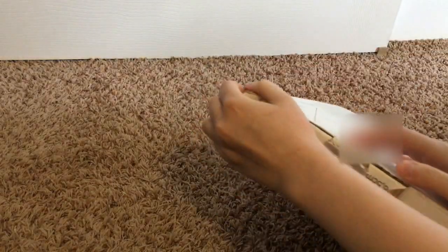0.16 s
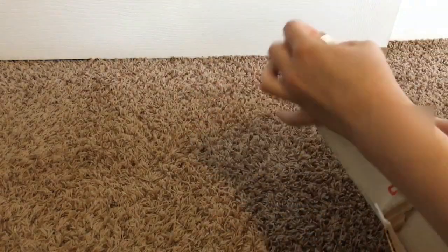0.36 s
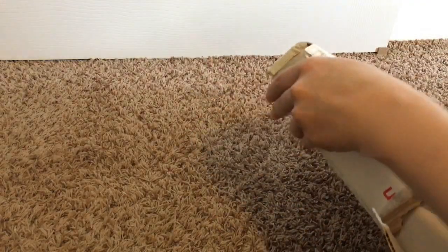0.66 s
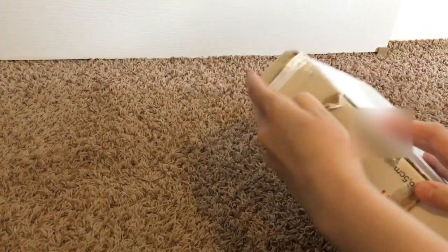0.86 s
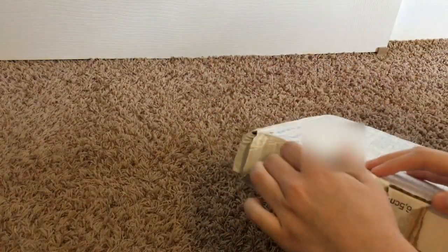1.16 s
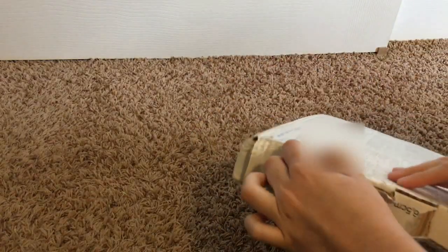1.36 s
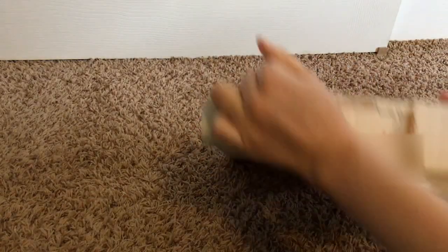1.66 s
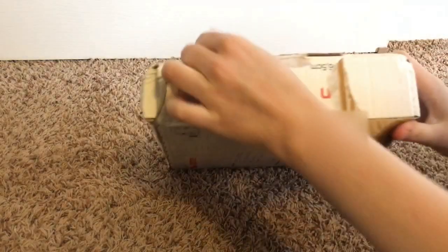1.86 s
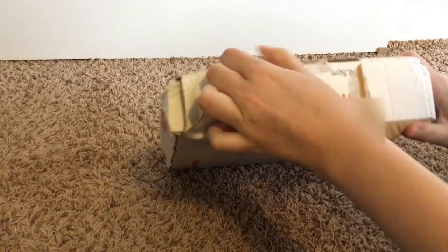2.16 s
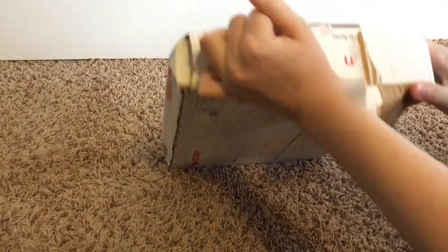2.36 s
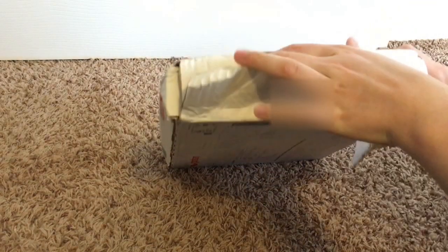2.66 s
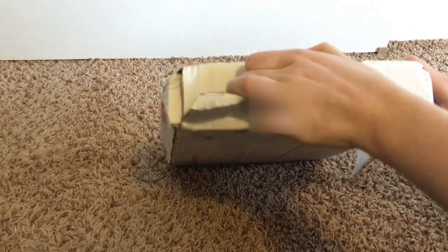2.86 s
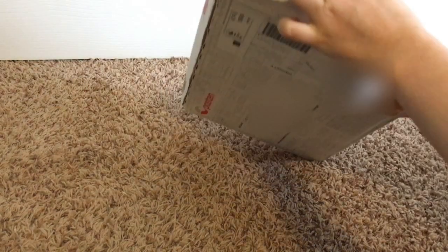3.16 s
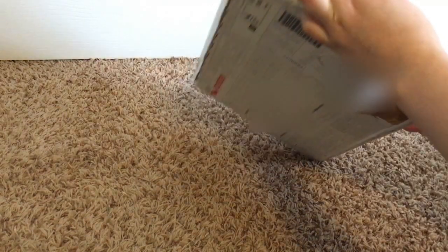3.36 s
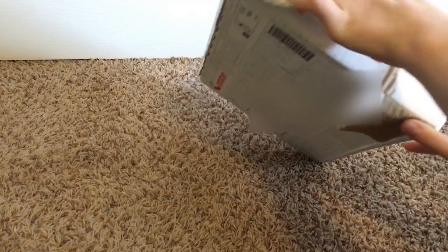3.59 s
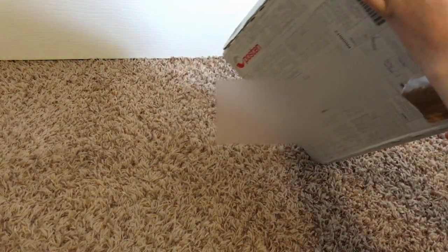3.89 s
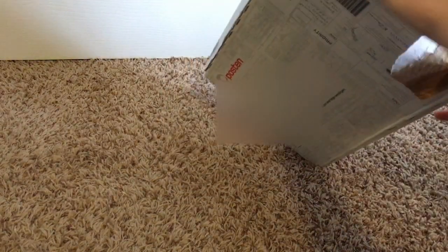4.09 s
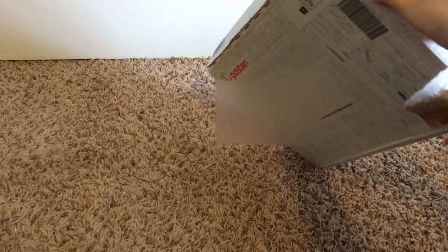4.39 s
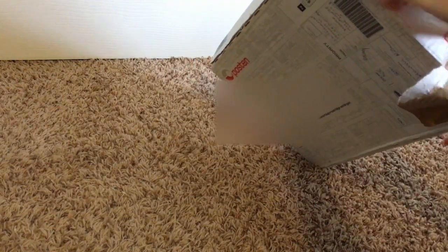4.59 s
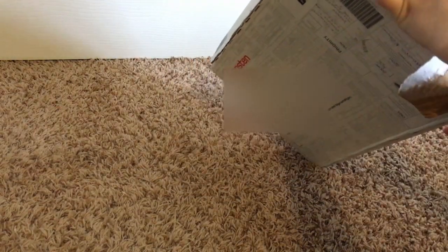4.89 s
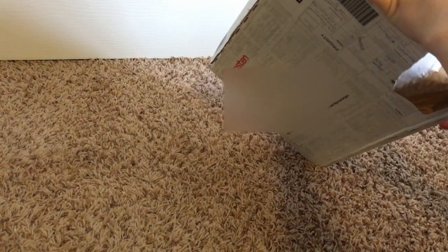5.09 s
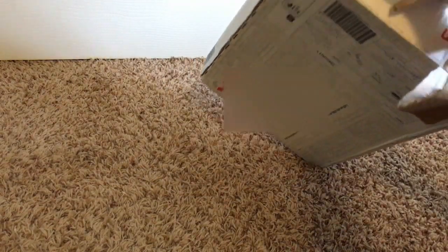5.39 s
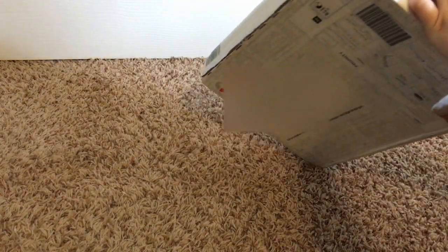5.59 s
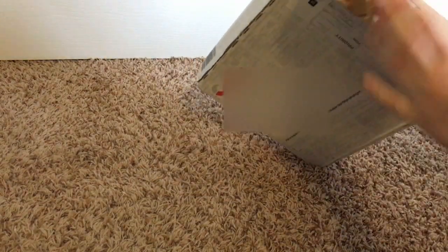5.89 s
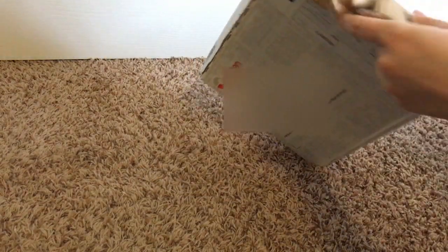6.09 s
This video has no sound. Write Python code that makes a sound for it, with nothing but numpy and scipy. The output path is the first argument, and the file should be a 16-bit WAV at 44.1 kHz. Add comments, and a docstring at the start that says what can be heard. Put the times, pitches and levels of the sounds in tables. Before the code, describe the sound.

Hands turn and pull open a cardboard mailing box on carpet, with soft scuffs, papery crinkles, sharp creases and one loud crack near the end.

```python
"""Opening a cardboard box on a carpet

A cardboard mailing box is turned over and pulled open by hand, close by in a small room.
Creases snap as short bending pulses, walls pop, binding flaps creak in trains of equal slips, and short rasps,
from soft scuffs to loud tears, are bursts of noise. Hands and flaps scuff and squeak: coloured noise and fuzzy
falling partials. All but the dull jolts rings briefly in the hollow box; a short room echo and quiet air
noise surround it."""
import sys
import numpy as np
from scipy import signal
from scipy.fft import rfft, irfft
from scipy.io import wavfile
from scipy.ndimage import uniform_filter1d, map_coordinates

SR = 44100
rng = np.random.default_rng(int(sys.argv[2]) if len(sys.argv) > 2 else 0)


def bounce(signal):
    """Save signal as a 16-bit WAV file at the path given by the first command-line argument."""
    frames = np.transpose(np.atleast_2d(signal))
    limited = np.clip(frames, -1, 1)
    pcm = np.round(limited * 32767).astype(np.int16)
    wavfile.write(sys.argv[1], SR, pcm)


N = 275625  # length in samples

# Before mixing, the level of a snap or slip is its rms over this many seconds.
SNAP_SPAN_S = .005

# Colour of the low drumming of rubbed board. Each row: frequency in Hz, relative level per hertz in dB.
DRUM_COLOUR = [(60, -47.5), (140, -4), (260, -4), (420, 1), (620, -1), (850, -8.5), (1300, -38.5)]
# Colour of the scuffing of rubbed board. Each row: frequency in Hz, relative level per hertz in dB.
SCUFF_COLOUR = [(500, -26.5), (850, -6), (1120, 3), (1600, 1), (2000, -5), (2600, -4), (3800, -6.5),
                (7000, -40)]
# Colour of hissing or cracking paper skin. Each row: frequency in Hz, relative level per hertz in dB.
HISS_COLOUR = [(2500, -33.5), (4000, -0.5), (4800, -3), (6000, 0.5), (8000, -4.5), (12000, -5),
               (16000, -10.5)]


def amp(db):
    """Turns decibels into a gain."""
    return 10 ** (np.asarray(db) / 20)


def unit(x):
    """Scales to rms 1."""
    return x / np.sqrt(np.mean(abs(x) ** 2) + 1e-20)


def read(points, hz):
    """Reads a table along a logarithmic frequency axis."""
    f, value = np.transpose(points)
    return np.interp(np.log(hz + 1), np.log(f + 1), value)


def add(mix, s, sound):
    """Mixes a sound in at s seconds."""
    part = mix[max(round(s * SR), 0):][:len(sound)]
    part += sound[:len(part)]


def causal(gain):
    """Finds the spectrum with these gains whose response starts at once and then dies away."""
    log_gain = np.log(np.maximum(gain, gain.max() * 1e-4))
    circle = np.concatenate([log_gain, log_gain[-2:0:-1]])
    return np.exp(np.conj(signal.hilbert(circle)))[:len(gain)]


def ringing(points, size=2048):
    """The response, of energy 1, of a board with this spectrum."""
    hz = np.fft.rfftfreq(size, 1 / SR)
    response = irfft(causal(amp(read(points, hz))))
    return response / np.linalg.norm(response)


def coloured(x, points):
    """Gives x a spectrum, at rms 1."""
    return unit(signal.oaconvolve(x, ringing(points))[:len(x)])


def hump(hz, centre_hz, octaves):
    """A broad resonance with steep skirts, at rms 1."""
    distance = np.log2((hz + 1) / centre_hz) / octaves
    return unit(1 / (1 + distance ** 2) ** 2)


def bend(pulse, pitch_hz, travel):
    """Bending waves: the treble travels faster and arrives first; the pitch takes `travel` seconds."""
    hz = np.fft.rfftfreq(len(pulse), 1 / SR)
    return irfft(rfft(pulse) * np.exp(-2j * np.pi * travel * 2 * np.sqrt(hz * pitch_hz)))


def wander(x, depth_db, size=512, count=36):
    """As the contact point moves, different resonances of the board come and go."""
    overlap = size * 3 // 4
    hz, _, z = signal.stft(x, SR, nperseg=size, noverlap=overlap)
    patches = unit(uniform_filter1d(rng.standard_normal((count, z.shape[1])), size=14, axis=1))
    band = np.interp(np.log(hz + 1), np.log(np.geomspace(150, 16000, count)), np.arange(count))
    where = np.meshgrid(band, np.arange(z.shape[1]), indexing="ij")
    field = map_coordinates(patches, where, order=1)
    return signal.istft(z * amp(depth_db * field), SR, nperseg=size, noverlap=overlap)[1][:N]


def snap(flex_db, pitch_hz, crack_db, thud_db, size=2048):
    """The board flexes and thuds while its paper skin cracks."""
    hz, t = np.fft.rfftfreq(size, 1 / SR), np.arange(size) / SR
    flex_gain = amp(flex_db) * hump(hz, pitch_hz * .96, octaves=0.93)
    thud_gain = amp(thud_db) * hump(hz, 472, octaves=0.9)
    gain = np.hypot(flex_gain, thud_gain)
    # the wave comes back from the nearest folds and edges, differently at every spot
    echoes = rfft((t == 0) + 0.19 * rng.standard_normal(size) * np.exp(-t / 0.0021))
    flex = unit(irfft(causal(gain) * echoes)) * np.sqrt(np.mean(gain ** 2))
    burst = rng.standard_normal(size) * np.exp(-t / 0.0014) * (t > .0003)
    crack = amp(crack_db) * coloured(burst, HISS_COLOUR)
    return (bend(flex, pitch_hz, travel=0.000625) + crack) * np.sqrt(SNAP_SPAN_S * SR / size)


def snaps():
    """Single buckles: creases snap, and whole walls pop in or out with a duller, hollow sound."""
    # A crease buckles. Each row: time in seconds, flex level in dB, nominal flex pitch in Hz,
    # level in dB of the crack of the paper skin; levels are before mixing.
    crease_rows = [(.2917, -37, 1310, -63), (.8647, -39, 3370, -42), (.932, -42.5, 1440, -41),
                   (1.0643, -35, 1860, -56), (1.1957, -34.5, 1840, -51), (1.213, -35, 1890, -49),
                   (1.2358, -34, 1970, -50), (1.2466, -33, 1810, -54), (1.2585, -32, 2010, -60),
                   (1.617, -21.5, 1740, -46), (1.9586, -35, 1480, -44), (1.9647, -34.5, 1120, -40.5),
                   (2.3457, -42, 1820, -51), (2.375, -51, 1910, -38), (2.389, -23, 2620, -26),
                   (2.5774, -22, 1100, -49), (2.5805, -32.5, 1260, -44.5), (2.6857, -43, 1900, -46),
                   (2.7341, -34.5, 1970, -72), (2.811, -36.5, 2270, -58), (2.8222, -37, 1960, -57),
                   (2.829, -32, 2060, -45), (2.843, -30.5, 2500, -46), (2.8462, -38, 1780, -51),
                   (2.972, -45, 3360, -38), (2.9832, -46, 2690, -36), (3.0082, -37, 1350, -62),
                   (3.0908, -38.5, 2400, -46), (3.1028, -41, 3100, -47), (3.5146, -33, 1480, -42),
                   (3.7578, -42.5, 1450, -45.5), (3.8971, -28, 1460, -36.5), (3.996, -35, 2210, -39),
                   (4.003, -32.5, 2150, -40), (4.018, -28, 1900, -47), (4.0224, -27.5, 1600, -39),
                   (4.687, -35.5, 2460, -35.5), (4.7414, -48, 1600, -39.5), (4.88, -41.5, 1200, -40.5),
                   (5.024, -39.5, 3120, -37.5), (5.0638, -39.5, 2320, -43), (5.0992, -33.5, 2260, -39.5),
                   (5.1148, -42, 2310, -39), (5.4427, -38, 1490, -51), (5.5618, -43, 3230, -36),
                   (5.6969, -17, 1570, -28.5), (5.7008, -12.5, 1350, -26), (5.8585, -36, 3180, -44),
                   (6.1137, -32, 3500, -40), (6.212, -43, 2370, -45.5)]
    # A whole wall pops. Each row: time in seconds, thud level in dB before mixing.
    pop_rows = [(0.0767, -41.5), (1.0643, -45.5), (1.3219, -37), (1.757, -44.5), (2.1247, -44),
                (2.389, -32.5), (2.5862, -36.5), (2.8458, -39), (3.2599, -38.5), (3.2979, -40.5),
                (3.3474, -46), (3.3638, -38.5), (3.386, -41.5), (3.4047, -41), (3.446, -41),
                (3.4525, -41.5), (3.5643, -42.5), (5.5508, -35.5), (5.9125, -47), (6.19, -41.5)]
    # the wider the fold, the lower it sounds and the more it thuds
    thud_re_flex_at_1khz_db, thud_fall_db_per_octave = -9, 17.5
    # all walls sound alike: nominal pitch, and flex and crack relative to the thud
    pop_hz, pop_flex_db, pop_crack_db = 1166, -1, -17
    out = np.zeros(N)
    for s, db, pitch_hz, crack_db in crease_rows:
        thud_db = db + thud_re_flex_at_1khz_db - thud_fall_db_per_octave * np.log2(pitch_hz / 1000)
        add(out, s - .0006, snap(db, pitch_hz, crack_db, thud_db))  # early, as the wave takes time to arrive
    for s, db in pop_rows:
        add(out, s - .0006, snap(db + pop_flex_db, pop_hz, db + pop_crack_db, db))
    return out


def rasps():
    """Short rasps, from soft scuffs to loud tears: uneven noise that rises quickly and dies away."""
    # Soft scuffs to loud tears of paper or tape. Each row: start in seconds, rise in seconds,
    # decay time constant in seconds, scuff level in dB before mixing, hiss and drumming in dB relative to it.
    rasp_rows = [(.185, 0.0018, 0.0086, -48, 0, 5), (.428, 0.0019, 0.0077, -43, -10, -5),
                 (.496, 0.0038, 0.0035, -43, -3, -7), (1.058, 0.01, 0.0084, -35.5, -11.5, -14),
                 (2.372, 0.0011, 0.0049, -32.5, -4.5, -13), (2.39, 0.00084, 0.0035, -25.5, 6, 2),
                 (2.394, 0.012, 0.011, -24, 5, -10), (2.835, 0.0066, 0.01, -32.5, -7.5, 0),
                 (3.996, 0.021, 0.016, -30.5, -0.5, -4), (4.157, 0.0018, 0.0089, -34, -12, -5.5),
                 (4.268, 0.0039, 0.0035, -41.5, 2, -11), (4.311, 0.0074, 0.011, -42.5, -14, -14),
                 (4.683, 0.011, 0.012, -33, -4, -9), (5.383, 0.002, 0.007, -40, -4, -8),
                 (5.498, 0.0015, 0.0063, -39.5, -10, -18), (5.549, 0.0021, 0.0093, -36, 6.5, 2),
                 (5.695, 0.0039, 0.002, -19.5, 3, -7.5)]
    # Colour of the hiss in a rasp. Each row: frequency in Hz, relative level per hertz in dB.
    rasp_hiss_colour = [(2000, -42.5), (3700, -7.5), (4900, 1), (6500, 2.5), (8500, -3.5), (11500, -2),
                        (16000, -9.5)]
    t, out = np.arange(SR // 4) / SR, np.zeros(N)
    for s, rise, decay, db, hiss_db, drum_db in rasp_rows:
        shape = np.minimum(t / rise, 1) * np.exp(-np.maximum(t - rise, 0) / decay)
        noise = rng.standard_normal(len(t))
        unevenness = unit(uniform_filter1d(rng.standard_normal(len(t)), size=30))
        rough = noise * amp(4.0 * unevenness)
        drum, scuff, hiss = (coloured(rough, colour) for colour in (DRUM_COLOUR, SCUFF_COLOUR, rasp_hiss_colour))
        add(out, s, amp(db) * shape * (scuff + amp(hiss_db) * hiss + amp(drum_db) * drum))
    return wander(out, depth_db=2.26)


def creak(rows, colour):
    """Stick and slip: every slip sends the same bending wave through the flap."""
    s, *columns = np.transpose(rows)
    t, out = np.arange(s[0], s[-1], 1 / SR), np.zeros(N)
    rate, db = (np.interp(t, s, c) for c in columns)
    slip = bend(ringing(colour), pitch_hz=1700, travel=0.001022) * np.sqrt(SNAP_SPAN_S * SR)
    slips_so_far = np.floor(np.cumsum(rate) / SR)
    for i in np.flatnonzero(np.diff(slips_so_far, prepend=-1)):
        late, harder = rng.standard_normal(2)  # slips vary slightly in time and force
        add(out, t[i] - .0006 + .0001 * late, amp(db[i] + 0.39 * harder) * slip)
    return out


def creaks():
    """A flap binds and slips twice, first briefly, then for longer."""
    # The two creaks as they go. Each row: time in seconds, slips per second, level in dB before mixing.
    short_rows = [(1.654, 98, -39), (1.662, 198, -39), (1.672, 290, -43), (1.684, 170, -41)]
    long_rows = [(5.2, 253.4, -41), (5.212, 326, -37.5), (5.228, 309, -38), (5.24, 211.8, -43),
                 (5.262, 185, -38), (5.282, 99.3, -31), (5.293, 154, -39), (5.306, 264, -34)]
    # Colour of one slip in each creak. Each row: frequency in Hz, relative level per hertz in dB.
    short_colour = [(200, -36), (600, -9), (1100, 4), (1450, 6), (2100, -31), (3500, -38), (12000, -50)]
    long_colour = [(150, -31), (350, -7.5), (430, 4.5), (520, -15), (1000, -8.5), (1620, 5.5), (2100, -3.5),
                   (2600, -6.5), (3100, -4), (4400, -12), (5200, -31), (6500, -24), (12000, -50)]
    return creak(short_rows, short_colour) + creak(long_rows, long_colour)


def contact():
    """Strength of drumming, scuff and hiss: each stroke takes hold, swells or eases, and lets go."""
    # A hand or flap slides over the board. Each row: start in seconds, length in seconds,
    # scuff level in dB before mixing, swell from start to end in dB, hiss and drumming in dB relative to scuff.
    stroke_rows = [(0, 0.041, -51, -10, -12, 1), (0.063, 0.063, -51.5, -7, 0.5, -1.5),
                   (0.176, 0.14, -53, 7, 0.5, -3.5), (0.355, 0.043, -56.5, 0, 1.5, -7),
                   (0.454, 0.083, -60.5, 14, -0.5, -4), (0.682, 0.041, -68.5, 2, -22, 14.5),
                   (.775, 0.025, -43, -1, 2, -22), (0.807, 0.097, -48.5, -4.5, 7, -17),
                   (0.936, 0.14, -56.5, -10, -1.5, -5.5), (1.068, 0.048, -52, -7, -7, -0.5),
                   (1.118, 0.091, -48.5, 5, 0, 3), (1.204, 0.063, -54, -6, -0.5, 3),
                   (1.309, 0.11, -50.5, -16, -7, -13), (1.383, 0.21, -52, 11.5, 2, -6.5),
                   (1.618, 0.086, -55, 7, -3.5, -3.5), (1.788, 0.076, -63.5, 7, 7, 4),
                   (1.88, 0.13, -56.5, -20, 0, -10.5), (2.063, 0.075, -46, -20, -7, -7.5),
                   (2.157, 0.03, -55.5, 0, -19, 1), (2.224, 0.16, -54.5, -11.5, -6, -3),
                   (2.421, 0.055, -44.5, 9.5, 3, -28), (2.57, 0.11, -49, 11.5, -2.5, -6.5),
                   (2.776, .1, -46.5, 7.5, -8.5, -1), (2.934, 0.2, -53, 2.5, -1.5, -8.5),
                   (3.319, 0.07, -54, 5, -3, -0.5), (3.44, 0.027, -53.5, -8, -24, 3),
                   (3.5, 0.11, -50.5, 10.5, 0.5, -6), (3.629, 0.13, -57.5, -7, 3, 1),
                   (3.787, 0.14, -52.5, 10, -4.5, -28), (4.162, 0.11, -53, -13, -2, -14),
                   (4.239, 0.12, -50.5, 7, -7, -11.5), (4.37, 0.2, -53.5, -9, 3.5, -15),
                   (4.565, 0.02, -49, 6, 3.5, -24), (4.658, 0.064, -49, 1, 3.5, -8),
                   (4.751, 0.18, -51, -5.5, -4, -9), (5.1, 0.085, -56.5, 2, -4, -26),
                   (5.21, .09, -47.5, 7, -8, -8.5), (5.308, 0.13, -51.5, -4, -4, -20),
                   (5.496, 0.081, -57, 7, -1, -11), (5.585, 0.035, -50.5, 5, -16, -22),
                   (5.696, 0.065, -42, -18, -10, -7), (5.823, 0.049, -53, -7, 1, -5.5),
                   (5.95, 0.069, -50.5, 3.5, 0.5, -9), (6.079, 0.12, -53, -2, 0, -6.5)]
    # Between strokes the holding hand still creeps on the board.
    # Each row: time in seconds, scuff level in dB before mixing.
    hold_rows = [(0, -60), (0.551, -59), (.65, -66.5), (1, -53.5), (1.8, -58), (2.03, -62.5), (2.5, -53.5),
                 (3.2, -60.5), (3.7, -60), (4.1, -59.5), (4.95, -60.5), (5.7, -56), (6.25, -62.5)]
    hold_hiss_db, hold_drum_db = -5.5, -4.5  # relative to the scuff
    attack_s, release_s = 0.013, 0.008  # every stroke takes hold and lets go alike
    hold_db = np.interp(np.arange(N) / SR, *np.transpose(hold_rows))
    power = amp([hold_db + hold_drum_db, hold_db, hold_db + hold_hiss_db]) ** 2
    t = np.arange(SR // 2) / SR
    for s, length, db, swell_db, hiss_db, drum_db in stroke_rows:
        shape = np.minimum(t / attack_s, 1) * np.exp(-np.maximum(t - length, 0) / release_s)
        push = shape * amp(db + swell_db * (np.minimum(t / length, 1) - .5))
        for layer, layer_db in zip(power, (drum_db, 0, hiss_db)):
            add(layer, s, (push * amp(layer_db)) ** 2)
    return np.sqrt(power)


def fibres(per_s, spread_db, smooth):
    """Tiny catches and breaks of uneven size over a smooth sliding noise."""
    size = amp(spread_db * np.minimum(rng.exponential(1, N), 4)) * rng.choice([-1, 1], N)
    catches = unit(size * (rng.random(N) < per_s / SR))
    return unit(catches + smooth * rng.standard_normal(N))


def rubbing(strength):
    """Sliding contact, gripping and letting go many times a second."""
    drum, scuff, hiss = strength
    # Each row: flutter frequency in Hz, relative level per hertz in dB
    flutter = coloured(rng.standard_normal(N), [(10, 1), (70, -10), (200, -43), (600, -73)])
    grip = unit(amp(2.8 * flutter))
    catches = fibres(per_s=1500, spread_db=2.5, smooth=0.99)
    slide = drum * coloured(fibres(per_s=400, spread_db=3.5, smooth=0.52), DRUM_COLOUR)
    slide = slide + scuff * coloured(catches, SCUFF_COLOUR) + hiss * coloured(catches, HISS_COLOUR)
    return wander(grip * slide, depth_db=3.5)


def crinkles(strength, force_db, skin_db, count=130):
    """Small creases pop here and there, about as loud as the rubbing that works them."""
    out = np.zeros(N)
    for when, force, pitch in rng.random((count, 3)):
        thud, flex, crack = 20 * np.log10(strength[:, int(when * N)]) + force_db * force
        add(out, when * N / SR, snap(flex, 1100 * 2.8 ** pitch, crack + skin_db, thud))
    return out


def squeak():
    """Fast, rough stick and slip: fuzzy partials that fall as the finger slows."""
    # A finger squeaks over the tape. Each row: time in seconds, level in dB before mixing, pitch in Hz.
    squeak_rows = [(.764, -55, 1715), (.772, -31.5, 1700), (0.777, -41, 1610), (0.784, -34, 1460),
                   (0.791, -44, 1300), (.806, -63, 1210)]
    # Its partials. Each row: multiple of the pitch, width in Hz, relative level in dB.
    partial_rows = [(.68, 160, -6.5), (1.001, 132, 1.5), (1.55, 350, -12.5), (2, 500, -11.5),
                    (3.45, 450, -10), (5.2, 4130, -8.5)]
    s, *columns = np.transpose(squeak_rows)
    t, out = np.arange(s[0], s[-1], 1 / SR), np.zeros(N)
    db, pitch_hz = (np.interp(t, s, c) for c in columns)
    angle = 2 * np.pi * np.cumsum(pitch_hz) / SR
    for multiple, width_hz, partial_db in partial_rows:
        noise = rng.standard_normal(len(t)) + 1j * rng.standard_normal(len(t))
        waver = signal.lfilter(*signal.butter(2, width_hz / 2, fs=SR), noise)
        partial = unit((waver * np.exp(1j * multiple * angle)).real)
        add(out, s[0], amp(db + partial_db) * partial)
    return out


def jolts():
    """Dull bumps as the pull lets go and the panels swing back, neighbouring modes in opposite directions."""
    # The whole box is jolted against the carpet.
    # Each row: time in seconds, level in dB before fading and filtering, decay time constant in seconds.
    jolt_rows = [(2.377, -42, 0.0084), (2.39, -37.5, 0.013), (4.012, -33.5, 0.011), (5.698, -36.5, 0.02)]
    # Slow swings of the large panels. Each row: frequency in Hz, relative level in dB.
    panel_rows = [(88, -3.5), (140, -1), (178, -12.5), (235, -4.5)]
    t, out = np.arange(SR // 4) / SR, np.zeros(N)
    swing = unit(sum((-1) ** k * amp(db) * np.sin(2 * np.pi * hz * t) for k, (hz, db) in enumerate(panel_rows)))
    for s, db, decay in jolt_rows:
        add(out, s, amp(db) * swing * (1 - np.exp(-t / 0.00074)) * np.exp(-t / decay))
    # a low cut near 68 Hz takes the deepest bass out of the bumps
    return signal.lfilter(*signal.butter(3, 68, "highpass", fs=SR), out)


def box(x):
    """The modes of the hollow box, rung by x."""
    # Ringing of the walls and the air inside.
    # Each row: frequency in Hz, relative level in dB, time to fade by 60 dB in seconds.
    mode_rows = [(384, -5.5, 0.065), (428.4, 4.5, 0.032), (500, 0, 0.064), (628, 7.5, 0.045),
                 (1080, 8.5, 0.017), (1260, -38, 0.057), (1360, -18, 0.099), (1610, -12, 0.026),
                 (2480, 1, 0.052), (2580, -15, 0.05)]
    t = np.arange(SR // 5) / SR
    ring = sum(amp(db - 60 * t / t60) * np.cos(2 * np.pi * hz * t) for hz, db, t60 in mode_rows)
    return signal.oaconvolve(x, ring / np.linalg.norm(ring))[:N]


def room(x, size=256):
    """Sparse reflections from wall and furniture, soon soaked up by the carpet."""
    # Fading of the echo, apart from the early boost below.
    # Each row: frequency in Hz, time to fade by 60 dB in seconds.
    fade_rows = [(150, 0.18), (600, 0.13), (1500, 0.23), (5000, 0.19), (15000, 0.19)]
    count = SR // 2
    taps = rng.choice([-1., 1.], count) * (rng.random(count) < 4000 / SR)  # about 4000 reflections a second
    taps = taps * (np.arange(count) > .003 * SR)
    hz, t, z = signal.stft(taps, SR, nperseg=size)
    early = 1 + 0.84 * np.exp(-t / 0.028)
    fade = amp(-60 * t / read(fade_rows, hz)[:, None])
    tail = signal.istft(z * early * fade, SR, nperseg=size)[1]
    return signal.oaconvolve(x, tail / np.linalg.norm(tail))[:N]


def still_air():
    """The still air of the room: steady, quiet coloured noise."""
    # Colour of the air noise. Each row: frequency in Hz, relative level per hertz in dB.
    air_colour = [(20, -49), (40, -32), (65, -11), (95, 2.5), (125, 3), (190, -8), (420, -7.5),
                  (800, -23.5), (2000, -25), (6000, -37.5), (16000, -35)]
    return amp(-59) * coloured(rng.standard_normal(N), air_colour)


def scene():
    """The handled box in its room."""
    flap_creaks = creaks()
    strength = contact()
    sliding = amp(-3.0) * rubbing(strength) + amp(-2.0) * squeak()
    sliding = sliding + amp(-3.5) * crinkles(strength, force_db=7, skin_db=-1)
    board = amp(-2.84) * snaps() + amp(-0.5) * flap_creaks + amp(-2.5) * rasps() + sliding
    near = board + amp(-23.0) * box(board) + jolts()
    air = still_air()
    return (near + amp(-12) * room(near) + air)[None]


def record(dry):
    """Removes the treble above about 16.1 kHz with a steep low-pass filter."""
    low_pass = signal.firwin(401, 16100, window=("kaiser", 8), fs=SR)
    return signal.oaconvolve(dry, low_pass[None], "same")


dry = scene()
out = record(dry)
bounce(out)
```